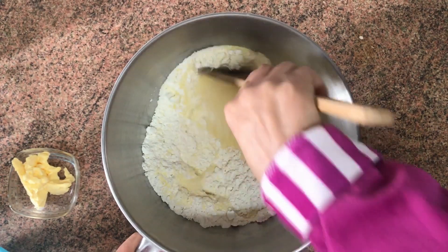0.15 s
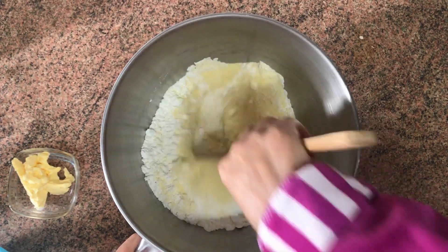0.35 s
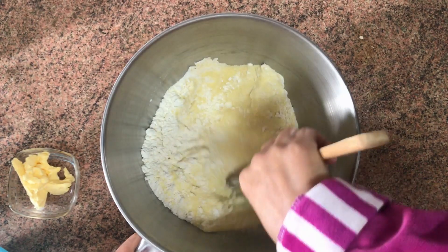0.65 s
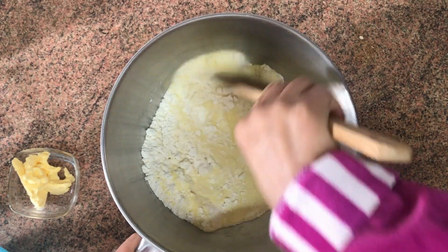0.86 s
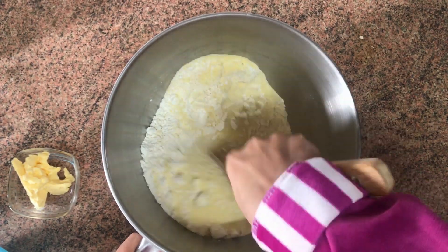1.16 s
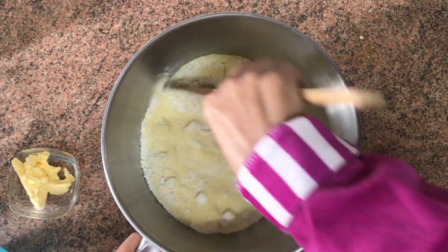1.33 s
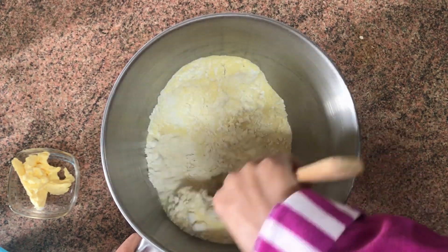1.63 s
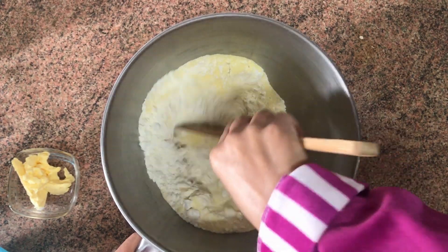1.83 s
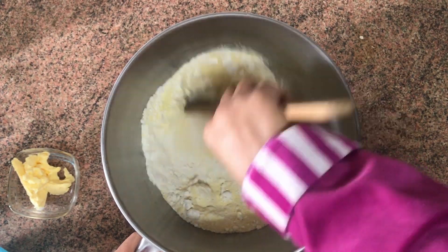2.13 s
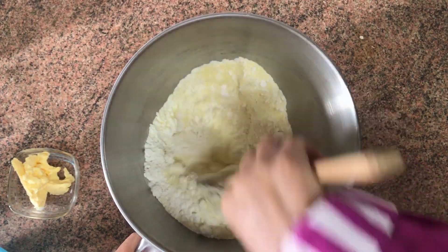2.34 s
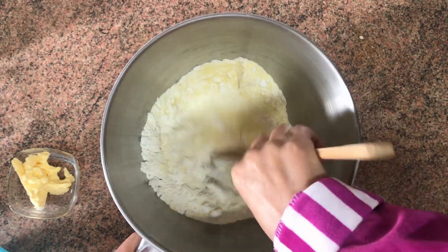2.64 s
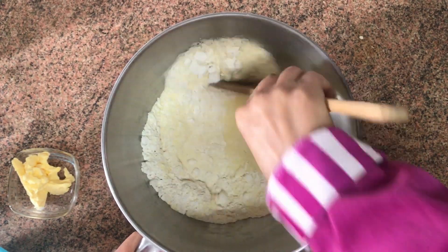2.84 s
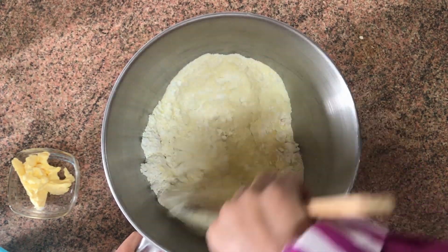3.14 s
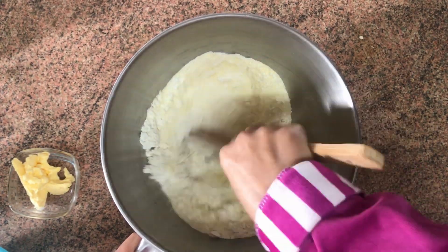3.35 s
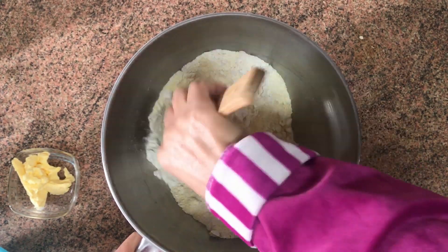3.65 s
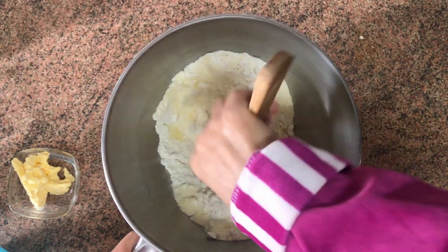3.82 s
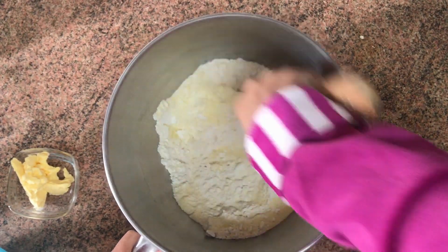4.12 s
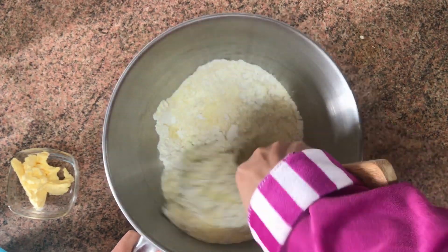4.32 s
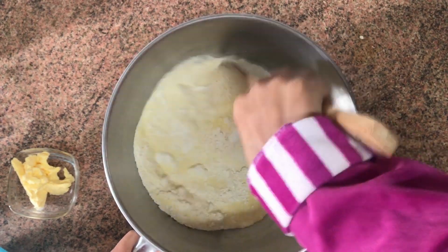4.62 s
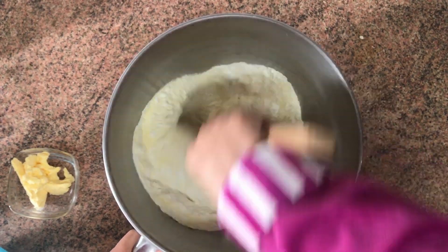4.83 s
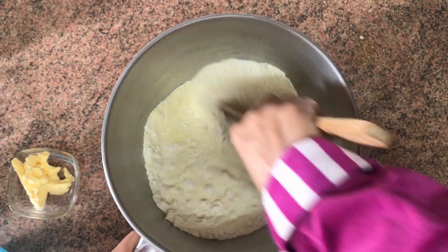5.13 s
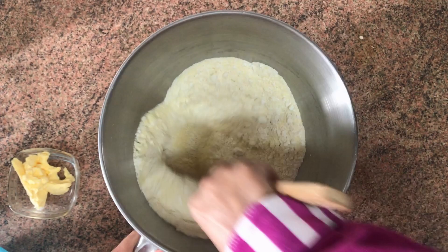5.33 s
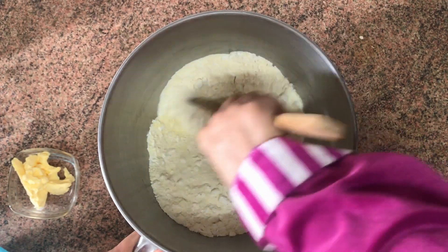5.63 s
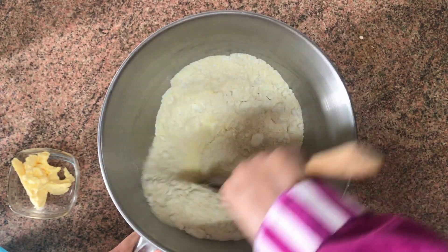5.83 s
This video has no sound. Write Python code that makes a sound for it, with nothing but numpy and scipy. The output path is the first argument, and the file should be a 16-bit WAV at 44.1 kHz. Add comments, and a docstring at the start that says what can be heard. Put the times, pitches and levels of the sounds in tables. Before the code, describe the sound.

A wooden spatula stirs dry flour in a steel bowl for about six seconds, heard up close. Strokes start at once and come unevenly, two or three a second. Each opens with a wooden clack on damped metal, then grinds along the wall in a short rasp that sinks in pitch, while flour hisses and slides back softly. The bowl rocks on the stone counter with dull thuds over a soft, lumpy rumble. A sharp knock stands out at about 1 second, and longer, fuller scrapes come between 3.3 and 4.2 seconds. After that a fine trickle of powder continues between strokes. The heaviest thuds fall at about 5.1, 5.5 and 5.7 seconds, the last with another sharp clack, and one more follows at 5.9. Behind it all are only faint reflections and the still air of a small kitchen.

```python
"""On a stone kitchen counter, a wooden spatula stirs dry flour in a steel bowl, heard up close.
Each stroke knocks the steel, then grinds along it with a sinking rasp while the flour
hisses and slides back. The bowl, damped by its load, rocks on the counter with dull thuds
over a soft rumble. Behind it are faint reflections and the still air of a small room."""
import sys
import numpy as np
from scipy import signal
from scipy.fft import irfft
from scipy.io import wavfile

SR = 44100
rng = np.random.default_rng(int(sys.argv[2]) if len(sys.argv) > 2 else 0)


def digitize_waveform(pressure):
    """Quantize a signal to 16-bit integers and store it at the path in sys.argv[1].

    Rows of a 2-D input are taken as channels; values are limited to [-1, 1].
    """
    field = np.atleast_2d(pressure).T
    bounded = np.clip(field, -1, 1)
    quanta = np.round(bounded * 32767).astype(np.int16)
    wavfile.write(sys.argv[1], SR, quanta)


N = 263365

# spatula strokes: (landing [s], rise [s], push length [s], fade [dB/s], lead-in [dB], grind [dB],
# rustle [dB], fizz [dB], rumble [dB], blade pitch [Hz], pitch sink [octaves/s]); levels are relative
STROKES = [(0.0, 0.001, 0.004, 236, 1, -48.5, -54, -49.5, -56.5, 2250, 24),
           (0.257, 0.012, 0.053, 128, -9, -43, -54, -45, -56.5, 1890, 4.5),
           (0.53, 0.0045, 0.016, 120, -24, -61, -63, -64, -81, 2390, 3),
           (.621, .006, .008, 200, -11, -52.5, -45.5, -59, -81, 2400, 3),
           (0.646, 0.015, 0.072, 111, -11, -47.5, -49, -52, -68, 1740, 2.4),
           (1, 0.012, 0.034, 36, -20, -43.5, -43.5, -45, -52.5, 1790, 2.8),
           (1.418, 0.054, 0.13, 82, -36, -48.5, -46, -58.5, -71, 2110, 6.2),
           (1.75, 0.0052, 0.064, 124, -9.5, -46, -56, -48.5, -56, 2150, 5.6),
           (2.127, 0.03, 0.073, 102, -14, -42, -57, -43, -53.5, 2570, 10.5),
           (2.527, 0.0069, 0.027, 197, -28, -56, -53, -57, -76, 2340, 4),
           (2.555, 0.013, 0.083, 161, -14.5, -43, -49.5, -49, -58.5, 2850, 7.6),
           (2.94, 0.0042, 0.1, 113, -9.5, -42.5, -55, -46, -52.5, 2540, 12),
           (3.306, 0.065, 0.12, 213, -22, -39.5, -44, -42.5, -49.5, 1900, 3.9),
           (3.678, 0.034, 0.11, 125, -19.5, -44, -44, -47, -50.5, 1380, 0.39),
           (4.071, 0.05, .1, 135, -19.5, -42, -42.5, -48.5, -68, 1560, 1.9),
           (4.258, .03, 0.092, 65, -14, -52, -53.5, -56.5, -59, 1920, 5.6),
           (4.614, 0.013, 0.035, 155, -9, -54.5, -49, -59, -70, 2070, 4),
           (4.805, 0.04, 0.071, 167, -11, -43.5, -43.5, -49, -53, 2460, 11.4),
           (5.064, .015, 0.033, 134, -10, -50, -69, -57, -59, 1220, 1),
           (5.177, 0.052, 0.11, 42, -12, -49, -65, -55.5, -55.5, 1590, 2.1),
           (5.47, .01, 0.036, 53, -11, -50, -63, -57, -61, 1370, 0.7),
           (5.683, 0.045, 0.056, 104, -4, -45, -58, -48.5, -50.5, 2420, 13),
           (5.906, .01, 0.019, 172, -10, -48.5, -64, -54, -72, 1860, 1)]


def grinding(singing_db=-45):
    """The blade sticks and slips over flour on the steel, in uneven clumps that sound its resonance."""
    # tone of the rubbing: (frequency [Hz], level [dB])
    rub_eq = [(60, -53), (150, 8), (260, -7), (370, 7.5), (480, -10.5), (740, -10), (1000, -4.5),
              (1250, -2.5), (1550, 0), (2450, -3), (2900, -4), (4400, -4), (6000, -13.5), (15000, -74)]
    slips = grains(per_s=4000, spread_db=1.0) * flutter(per_s=230, depth_db=1.5)
    pitch = blade_pitch()
    blade = unit(resonate(resonate(slips, pitch, width_hz=700), pitch, width_hz=700))
    push = stroke_gain("grind", rise_scale=0.91, fade_scale=0.92, rest_db=-78.5)
    # a light touch only rubs; a hard push makes the blade rasp at its own pitch
    rasp = push / (push + amp(singing_db) * 2)
    scrape = np.sqrt(1 - rasp) * unit(colour(slips, rub_eq)) + np.sqrt(rasp) * blade
    return amp(1.0) * unit(hollow(steel(scrape, ring_db=-17), echo_db=-3)) * push


def blade_pitch(bent_hz=1170):
    """Each landing resets the blade's resonance, which sinks as the blade digs in and bends."""
    t, strokes = np.arange(N) / SR, np.array(STROKES)
    current = np.maximum(np.searchsorted(strokes[:, 0], t) - 1, 0)
    start, hz, sink = strokes[current, 0], strokes[current, -2], strokes[current, -1]
    return np.maximum(hz * 2 ** (-sink * (t - start)), bent_hz)


def knocks(chatter_db=-3, blade_db=7, blade_q=6.8, treble_hz=2800, clean_s=0.00074):
    """The blade lands: a short contact is one clean clack, a long one swells into a chatter."""
    # wood on steel: (time [s], level over 5 ms [dB], blade pitch [Hz], treble [dB], chatter length [s])
    hits = [(.004, -42, 2400, -9, 0.002), (0.265, -31.5, 2430, -12, 0.0016), (0.272, -32, 1720, 3, 0.0008),
            (0.627, -53, 7650, 16, 0.0022), (0.657, -35, 2430, -1.5, 0.002),
            (1.0072, -24.5, 1700, -8, 0.0012), (1.4244, -44.5, 2170, 16, .0007),
            (1.755, -37.5, 1670, -3, 0.00088), (2.134, -31, 2180, -5.5, 0.0056),
            (2.561, -39, 2340, -3, 0.0023), (2.633, -39, 1700, -1, 0.0048),
            (2.8146, -40.5, 2070, -40, 0.00015), (2.82, -45, 2100, -40, 0.00025),
            (2.940, -39.5, 1560, -7, 0.0024), (3.022, -39, 1150, -14, 0.0037),
            (3.319, -42, 1460, -10, 0.0039), (3.339, -35.5, 7750, 6, 0.0043),
            (3.351, -40, 1700, -17, 0.0008), (3.428, -38.5, 1920, -8, 0.0054),
            (3.679, -34.5, 1160, -27, 0.0026), (3.844, -40.5, 1890, -10, 0.0032),
            (4.071, -38.5, 2000, -5, 0.0034), (4.148, -39.5, 1500, -27, 0.0052),
            (4.22, -44.5, 1550, -4, 0.0022), (4.620, -42.5, 1770, -2, 0.0012),
            (4.758, -41, 2360, -3, 0.0021), (4.849, -39.5, 1620, -8, 0.0011),
            (5.0985, -40, 1110, -12, 0.00017), (5.297, -44, 2270, -2, 0.0021),
            (5.4947, -42, 1220, -16, 0.00032), (5.691, -38.5, 2140, -2, 0.00082),
            (5.7394, -23.5, 2320, -5.5, 0.00076), (5.743, -35, 6100, -2, 0.0037)]
    # tone of the clack: (frequency [Hz], level [dB])
    clack_eq = [(200, -47), (400, -12), (700, -13.5), (1050, -4), (1400, 1.5), (2450, 0), (2950, -5),
                (4000, -0.5), (4900, -4), (5500, -2), (7500, -1), (10400, -10.5), (12500, -6), (16000, -22)]
    out, t = np.zeros(N), np.arange(SR // 12) / SR
    # thin steel spreads a blow over a millisecond or so, treble first
    bending = np.sqrt(np.fft.rfftfreq(4096, 1 / SR))
    blow = irfft(np.exp(-1j * np.pi * bending / 5))[:len(t)]
    for start, db, hz, treble_db, length in hits:
        clack = np.exp(1 - length / clean_s) * blow
        chatter = unit_energy(rng.standard_normal(len(t)) * t * np.exp(-t / length))
        wood = colour(clack + amp(chatter_db) * chatter, clack_eq)
        # the blade's pitch depends on how it meets the wall
        wood = wood + amp(blade_db) * signal.lfilter(*signal.iirpeak(hz, blade_q, SR), wood)
        wood = colour(wood, [(treble_hz, 0), (2 * treble_hz, treble_db)])
        add(out, start, amp(db) * unit_energy(wood) * np.sqrt(SR // 200))
    return out


def flour():
    """Powder rustles as it slides down the wall, and fizzes finely where the blade shears it."""
    # tone of sliding powder: (frequency [Hz], level [dB])
    rustle_eq = [(900, -28), (3000, -21), (4700, -11), (5600, -4.5), (6800, -2.5), (7350, 3), (7900, 3.5),
                 (8600, -3.5), (9500, -9.5), (10400, -15), (16000, -31)]
    # tone of sheared powder: (frequency [Hz], level [dB])
    fizz_eq = [(900, -11), (3000, -10), (4900, -2), (5600, 5.5), (7000, 2.5), (9600, 3), (10400, -2),
               (12200, 4), (13800, 0.5), (16000, -0.5)]
    sliding = grains(per_s=12000, spread_db=-2.5) * flutter(per_s=32, depth_db=3.5)
    sheared = grains(per_s=18000, spread_db=-2.5) * flutter(per_s=200, depth_db=1.8)
    flow = np.hypot(stroke_gain("rustle", rise_scale=0.32, fade_scale=1.0, rest_db=-70.5),
                    slide_gain("rustle", trickle_db=-58.5))
    shear = np.hypot(stroke_gain("fizz", rise_scale=1.16, fade_scale=0.86, rest_db=-73),
                     slide_gain("fizz", trickle_db=-66.5))
    rustle = hollow(steel(colour(sliding, rustle_eq), ring_db=-15.5), echo_db=-0.5)
    fizz = hollow(colour(sheared, fizz_eq), echo_db=-11.0)
    return amp(-1.5) * unit(rustle) * flow + amp(3.5) * unit(fizz) * shear


def thuds(scatter_db=2.0, sharp=0.057, relax_s=0.0083, rattle_db=-17, rattle_s=0.0099):
    """The base drops back on the counter and rattles briefly; a longer contact gives a duller thud."""
    # landings of the rocking bowl: (time [s], peak before EQ [dB], contact time [s])
    landings = [(.008, -34.5, 0.00028), (0.272, -37, 0.0019), (.295, -38, 0.0029), (1.011, -32.5, 0.00055),
                (1.058, -39.5, 0.002), (1.43, -39.5, 0.0056), (1.554, -31.5, 0.00089),
                (1.756, -26, 0.00042), (1.797, -33, 0.00049), (1.814, -29, 0.0014), (2.242, -34.5, 0.0041),
                (2.563, -36.5, 0.0087), (2.699, -39.5, 0.00039), (2.945, -26, 0.0012),
                (2.972, -31.5, 0.0021), (3.037, -32.5, 0.00048), (3.317, -26, 0.0011),
                (3.351, -37.5, 0.0021), (3.685, -26.5, 0.0017), (3.851, -34, 0.0059),
                (4.076, -39.5, 0.0078), (4.220, -36, 0.00044), (4.625, -32, 0.0055), (4.759, -38.5, 0.0012),
                (5.099, -15, 0.00091), (5.303, -33, 0.0022), (5.498, -18.5, 0.00093), (5.695, -31, 0.0063),
                (5.744, -20, 0.0028), (5.933, -22, 0.0015)]
    # low modes of the loaded bowl: (frequency [Hz], level [dB], t60 [s])
    body_modes = [(95.6, -15, 0.2), (164, -18, 0.092), (165.2, -5.5, 0.095), (210, -5.5, 0.088),
                  (251, -6.5, 0.025), (292, -9, 0.15), (350.1, 2, 0.084), (370.4, 2, 0.11),
                  (411.7, 0, 0.12), (524, -44, .07), (526, -17, 0.14), (534, -10, 0.075), (580, -41, 0.026),
                  (750, 0, 0.033), (885, 2.5, 0.054), (1030, -10, 0.053), (1030, -31, 0.1)]
    out, t = np.zeros(N), np.arange(SR // 3) / SR
    hz, mode_db, t60 = np.transpose(body_modes)[:, :, None]
    # pressed down, the bowl rings a little sharp, then relaxes
    cycles = hz * (t + sharp * relax_s * (1 - np.exp(-t / relax_s)))
    places = rng.standard_normal((len(landings), len(body_modes), 1))  # each spot favours other modes
    for (start, db, contact), place in zip(landings, places):
        decays = amp(mode_db + scatter_db * place - 60 * t / t60)
        body = (decays * np.cos(2 * np.pi * cycles)).sum(0)
        rattle = unit_energy(rng.standard_normal(len(t)) * np.exp(-t / rattle_s))
        impact = signal.unit_impulse(len(t)) + amp(rattle_db) * rattle
        force = signal.fftconvolve(impact, t * np.exp(-4 * t / contact))
        thud = signal.fftconvolve(body, force)[:len(t)]
        add(out, start, amp(db) * thud / abs(thud).max())
    return colour(out, [(25, -45), (130, 5), (1200, -1.5), (3000, -6.5)])


def rumble():
    """The heap and the arm shove the bowl about with a soft, lumpy rumble."""
    # tone of the shoved bowl: (frequency [Hz], level [dB])
    rumble_eq = [(20, -32), (35, -10.5), (50, -3), (75, -3), (108, 0.5), (170, -7), (260, -11),
                 (360, -11.5), (500, -12.5), (900, -18), (3000, -102)]
    shove = stroke_gain("rumble", rise_scale=0.45, fade_scale=0.51, rest_db=-66)
    return amp(1.5) * unit(colour(rng.standard_normal(N), rumble_eq)) * shove


def stroke_gain(layer, rise_scale, fade_scale, rest_db,
                lead_db_per_s=254, ease_db_per_s=20.5, lift_db_per_s2=93):
    """One layer's envelope: the blade plows through flour, lands, pushes ever less and lifts clear."""
    column = {"grind": 5, "rustle": 6, "fizz": 7, "rumble": 8}[layer]
    power = np.full(N, amp(rest_db) ** 2)
    for stroke in STROKES:
        start, rise, length, fade_db_per_s, lead_db = stroke[:5]
        t = np.arange(N) / SR - start
        lead_in = amp(lead_db + lead_db_per_s * np.minimum(t, 0))
        attack = np.maximum(lead_in, np.clip(t / (rise * rise_scale), 0, 1))
        slack_db = ease_db_per_s * np.clip(t, 0, length)
        lifting_s = np.clip(t - length, 0, 1)
        release_db = fade_scale * fade_db_per_s * lifting_s + lift_db_per_s2 * lifting_s ** 2
        power += (attack * amp(stroke[column] - slack_db - release_db)) ** 2
    return np.sqrt(power)


def slide_gain(layer, trickle_db, loose_from_s=4.2):
    """Flour slides back between pushes in soft swells, over a steady trickle once the heap is loose."""
    # slides of flour: (middle [s], half length [s], relative rustle [dB], relative fizz [dB])
    slides = [(0.17, 0.019, -56.5, -71), (0.973, 0.012, -49, -59), (1.385, 0.011, -55, -62.5),
              (1.635, 0.0076, -55, -68), (1.705, 0.059, -58, -63.5), (1.9, 0.035, -50.5, -60),
              (2.32, .035, -50, -57), (2.699, .025, -63, -50.5), (2.865, .022, -50.5, -60),
              (3.094, 0.039, -52, -49.5), (3.177, 0.022, -52, -79), (3.25, 0.016, -67, -62),
              (4.407, 0.073, -53, -56), (4.57, .05, -48.5, -57.5), (5.025, 0.059, -51.5, -56.5),
              (5.17, 0.047, -57, -54), (5.415, 0.042, -48.5, -54), (5.615, 0.043, -52, -50.5),
              (5.84, 0.056, -49.5, -57)]
    column = {"rustle": 2, "fizz": 3}[layer]
    t = np.arange(N) / SR
    swell_power = sum(amp(row[column]) ** 2 * np.exp(-((t - row[0]) / row[1]) ** 2) for row in slides)
    trickle = amp(trickle_db) * np.clip((t - loose_from_s) * 10, 0, 1)
    return np.sqrt(swell_power + trickle ** 2)


def steel(x, ring_db):
    """What touches the bowl is heard directly and through the ring of its wall."""
    # modes of the steel wall: (frequency [Hz], level [dB], t60 [s])
    wall_modes = [(922, 12, 0.023), (992, 9, 0.058), (1074, 3.5, 0.061), (1093, -7.5, 0.11),
                  (1375, -10.5, 0.05), (1507, -3, 0.043), (1733, -15, 0.081), (1800, -15, 0.037),
                  (1873, -20, 0.2), (2320, 1, 0.042), (2442, 5, 0.022), (4497, 4, 0.05),
                  (5306, 13.5, 0.019), (7250, 10, 0.015), (7350, 1, 0.03)]
    t = np.arange(SR // 3) / SR
    ring = sum(amp(db - 60 * t / t60) * np.cos(2 * np.pi * hz * t) for hz, db, t60 in wall_modes)
    ring *= 1 - np.exp(-t / 0.0013)  # bending waves take a moment to circle the bowl
    return x + amp(ring_db) * signal.fftconvolve(x, unit_energy(ring))[:N]


def hollow(x, echo_db, t60=0.074, stirs_per_s=2.6):
    """Echoes inside the bowl comb the sound, differently at each of three places the blade passes."""
    t, out = np.arange(SR // 16) / SR, x
    for place, noise in enumerate(rng.standard_normal((3, len(t)))):
        echoes = unit_energy(noise * amp(-60 * t / t60) * (t > .001))
        angle = 2 * np.pi * (stirs_per_s * np.arange(N) / SR + place / 3)
        nearness = np.maximum(np.cos(angle), 0)
        out = out + amp(echo_db) * signal.fftconvolve(x * nearness, echoes)[:N]
    return out


def kitchen(x, wet_db=-19, t60=0.26):
    """Faint reflections from the walls of a small room."""
    t = np.arange(SR // 2) / SR
    reflections = rng.standard_normal(len(t)) * (rng.random(len(t)) < .06)
    tail = unit_energy(reflections * amp(-60 * t / t60) * (t > .004))
    warm_tail = colour(tail, [(200, 11.8), (3000, 4.3), (14000, 3.3)])
    return x + amp(wet_db) * signal.fftconvolve(x, warm_tail)[:N]


def room_air():
    """Still air: a steady low murmur with a thin hiss."""
    # room tone: (frequency [Hz], level [dB])
    air_eq = [(12, -25), (20, -8), (106, 14), (252, -6), (362, -9), (705, -20), (1100, -65), (1200, -29),
              (1540, -2), (4950, -7.5), (7520, -27), (10500, -37), (15500, -8)]
    return amp(-66.0) * unit(colour(rng.standard_normal(N), air_eq))


def grains(per_s, spread_db):
    """Tiny slips of uneven size at random moments."""
    size = amp(spread_db * np.minimum(rng.exponential(1, N), 4))
    polarity = rng.choice([-1, 1], N)
    return unit(size * polarity * (rng.random(N) < per_s / SR))


def flutter(per_s, depth_db):
    """A gain that wanders to a new random level per_s times a second."""
    knots = rng.standard_normal(4096)
    return amp(depth_db * np.interp(np.arange(N) / SR * per_s, np.arange(len(knots)), knots))


def resonate(x, hz, width_hz):
    """A resonance of gain 1 that follows the curve hz."""
    phasor = np.exp(2j * np.pi * np.cumsum(hz) / SR)
    pole = np.exp(-np.pi * width_hz / SR)
    return 2 * (phasor * signal.lfilter([1 - pole], [1, -pole], x / phasor)).real


def colour(x, points):
    """Minimum-phase EQ through points of (frequency [Hz], gain [dB])."""
    hz, db = np.transpose(points)
    bins_hz = abs(np.fft.fftfreq(4096, 1 / SR))
    log_gain = np.log(amp(np.interp(np.log(bins_hz + 1), np.log(hz), db)))
    taps = np.fft.ifft(np.exp(np.conj(signal.hilbert(log_gain)))).real
    return signal.fftconvolve(x, taps[:len(taps) // 2])[:len(x)]


def amp(db):
    """Decibels to gain."""
    return 10 ** (np.asarray(db) / 20)


def unit(x):
    """Scales to rms 1."""
    return x / np.sqrt(np.mean(x ** 2) + 1e-20)


def unit_energy(x):
    """Scales to a total energy of 1."""
    return x / np.linalg.norm(x)


def add(mix, start_s, sound):
    """Mixes a sound in at start_s."""
    part = mix[max(round(start_s * SR), 0):][:len(sound)]
    part += sound[:len(part)]


def scene():
    """The stirred bowl in the kitchen, the same in both channels."""
    bowl = grinding() + flour() + steel(knocks(), ring_db=-8.5) + thuds() + rumble()
    air = room_air()
    return np.tile(kitchen(bowl) + air, (2, 1))


def record(dry, low_cut_hz=38, top_hz=15900):
    """The microphone's low cut, then the recorder's band limit."""
    lean = signal.sosfilt(signal.butter(3, low_cut_hz, "highpass", fs=SR, output="sos"), dry)
    band_limit = signal.firwin(511, top_hz, window=("kaiser", 9), fs=SR)
    return signal.oaconvolve(lean, band_limit[None], "same")


dry = scene()
out = record(dry)
digitize_waveform(out)
```